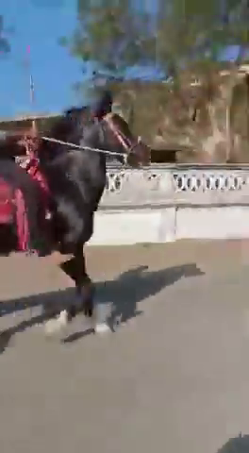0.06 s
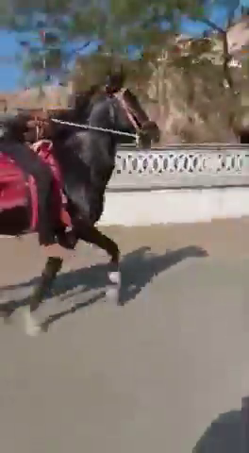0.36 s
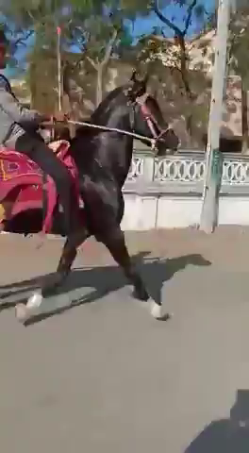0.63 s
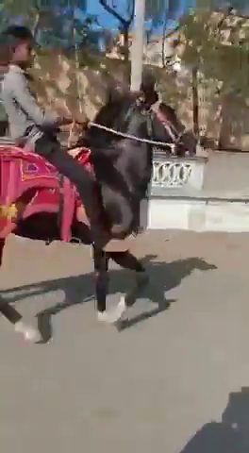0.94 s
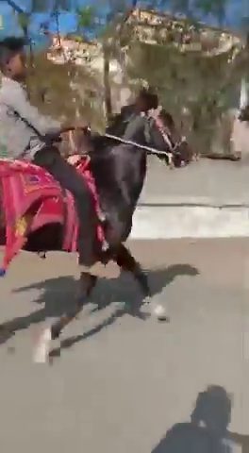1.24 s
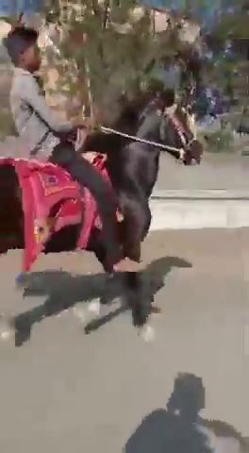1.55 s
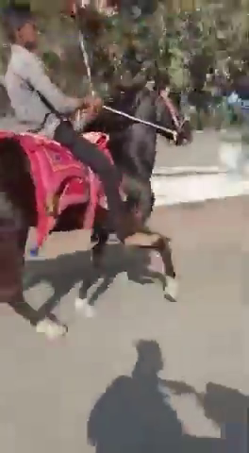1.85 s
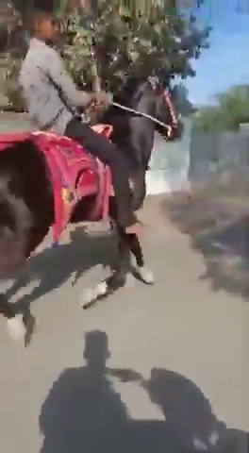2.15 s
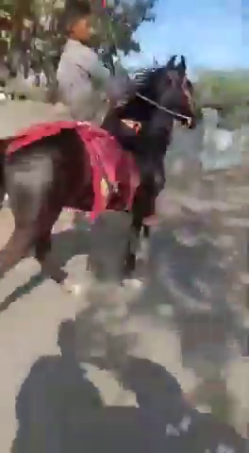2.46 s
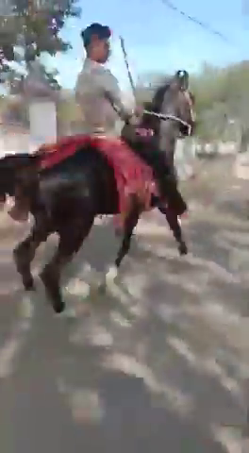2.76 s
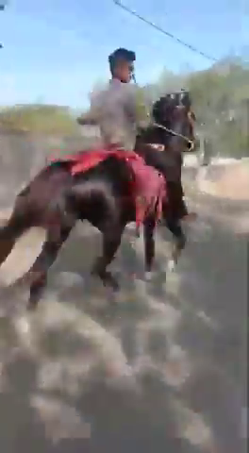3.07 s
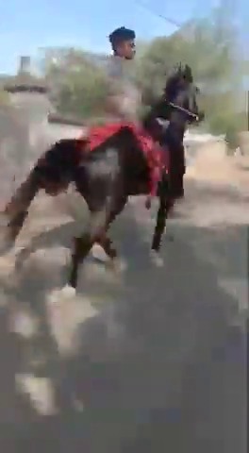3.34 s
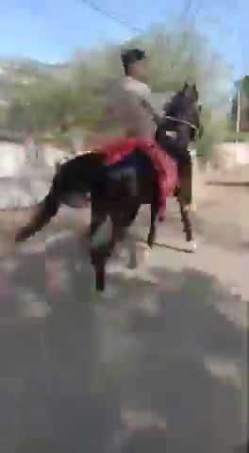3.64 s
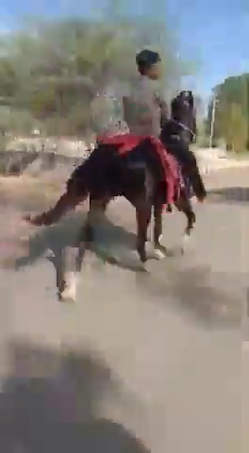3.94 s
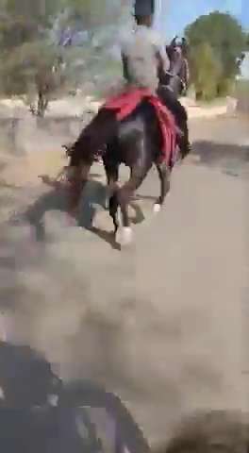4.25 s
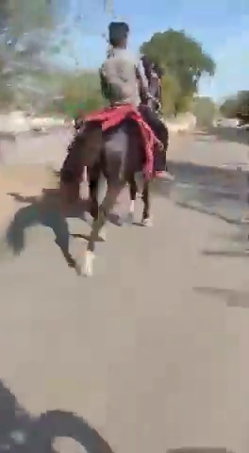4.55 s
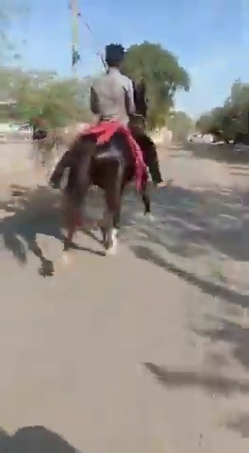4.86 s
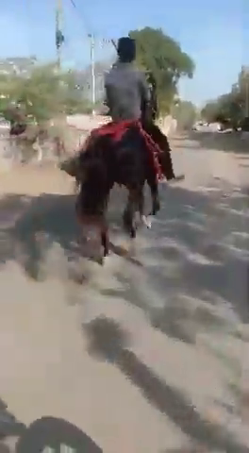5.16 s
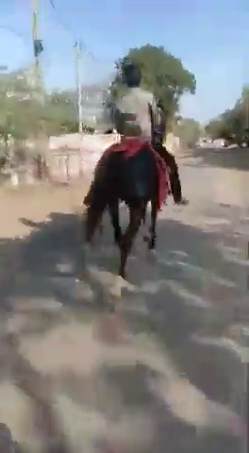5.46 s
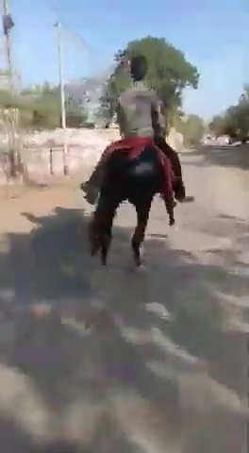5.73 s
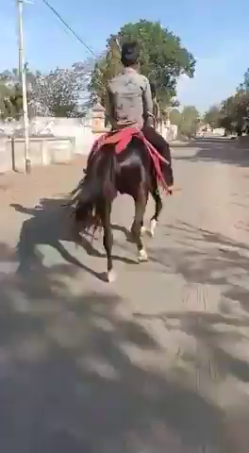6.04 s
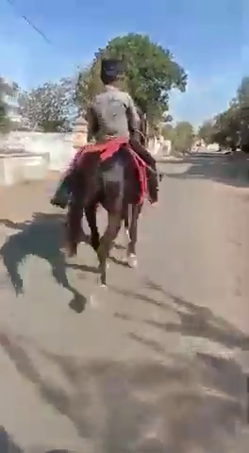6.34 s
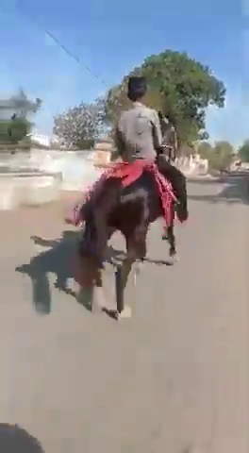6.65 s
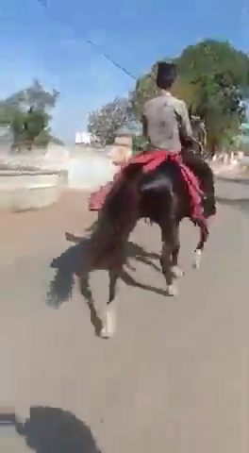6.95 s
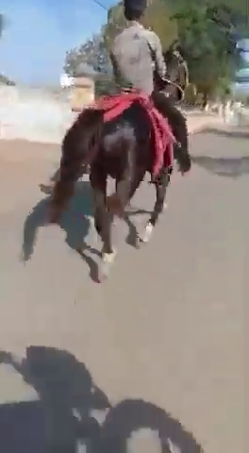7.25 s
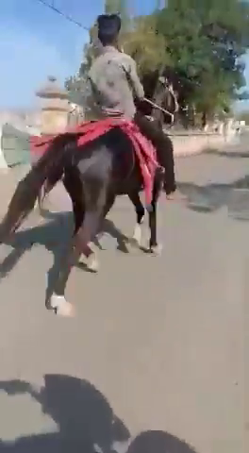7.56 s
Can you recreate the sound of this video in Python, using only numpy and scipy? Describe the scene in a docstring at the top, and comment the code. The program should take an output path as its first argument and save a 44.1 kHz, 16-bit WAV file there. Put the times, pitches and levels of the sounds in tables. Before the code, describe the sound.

Wind rumbles and gusts on the microphone over fast, sharp hoofbeats on pavement and a nearby motorcycle's low thump and hiss.

```python
"""A horse at a fast four-beat gait on a gritty paved road, heard from a motorcycle following behind.
About nine times a second a hoof lands: its wall knocks, the hollow under the sole clops, grit crunches,
and the roadside returns a short echo. Wind buffets, slaps and roars right on the mono microphone. Under
it, close by, the engine thumps and hisses; two thin squeaks pass, and for a moment a loose part rattles,
starting in time with the engine and quickening."""
import sys
import numpy as np
from scipy import signal
from scipy.fft import rfft, irfft
from scipy.io import wavfile
from scipy.ndimage import uniform_filter1d

SR = 44100
rng = np.random.default_rng(int(sys.argv[2]) if len(sys.argv) > 2 else 0)


def inscribe(sig):
    """Save sig as 16-bit PCM at rate SR to the path in sys.argv[1].

    A 1-D sig is mono; a 2-D sig holds one channel per row.
    Samples are clipped to [-1, 1] before scaling.
    """
    pcm = np.round(np.clip(np.atleast_2d(sig).T, -1, 1) * 32767)
    wavfile.write(sys.argv[1], SR, pcm.astype(np.int16))


N = 335160
TIME = np.arange(N) / SR
GUST_S = 0.021  # half length of a gust, lull or big eddy

# hoof falls: t/s, knock level/dB, knock f/Hz, clop level/dB, clop f/Hz, grit level/dB, crunch length/s
HOOF_FALLS = [(0.0024, -49.5, 2290, -37.5, 1440, -35, 0.011), (0.13, -46, 2230, -30, 1120, -43, 0.022),
              (0.2263, -57, 2440, -39, 960, -35.5, 0.013), (0.3285, -33, 2520, -54, 1340, -34, 0.014),
              (0.4364, -33, 2100, -31, 1440, -36.5, 0.02), (0.4935, -48, 2660, -51, 1540, -33.5, 0.006),
              (0.5586, -58, 2560, -44, 1410, -43, 0.018), (0.653, -59, 2290, -39, 1510, -38.5, 0.011),
              (0.7541, -39, 2680, -37, 1070, -35.5, 0.008), (0.8773, -49, 2500, -31.5, 1470, -37, 0.022),
              (0.977, -54, 2810, -42, 1020, -42, 0.018), (1.082, -52, 2470, -49, 1350, -39, 0.023),
              (1.1876, -40, 2130, -29, 1500, -37, 0.0079), (1.2987, -31.5, 2230, -36, 1540, -42, 0.023),
              (1.404, -43, 2490, -34, 1120, -40.5, 0.014), (1.525, -48, 2060, -36.5, 1480, -43, 0.016),
              (1.614, -49, 2220, -36, 1090, -43.5, 0.0078), (1.729, -45, 2030, -33, 1310, -39.5, 0.026),
              (1.837, -37.5, 2220, -29, 1170, -51, 0.012), (1.942, -42, 2280, -31.5, 980, -40.5, 0.018),
              (2.041, -30, 2140, -30, 1160, -40, 0.014), (2.1577, -31, 2110, -35, 1140, -38.5, 0.024),
              (2.255, -39, 2390, -39, 1210, -40.5, 0.014), (2.3688, -42, 2250, -50, 1250, -35, 0.0086),
              (2.465, -35, 2480, -38, 1190, -42.5, 0.0091), (2.574, -45, 2430, -35, 1140, -37.0, 0.021),
              (2.687, -35, 2160, -29, 1080, -37, 0.0093), (2.796, -49, 2680, -33, 1200, -35, 0.021),
              (2.894, -39.5, 2480, -34, 1200, -37, 0.0064), (3.0012, -35, 2670, -32, 1250, -33, 0.013),
              (3.108, -39, 2670, -41, 1530, -38.5, 0.01), (3.231, -37, 2500, -38, 1340, -39.5, 0.022),
              (3.3115, -33.5, 2320, -31, 980, -39.5, 0.015), (3.424, -24.5, 2380, -31, 1300, -40, 0.026),
              (3.534, -38.5, 2430, -45.5, 1470, -40, 0.0045), (3.6388, -34, 2820, -29, 1200, -35.5, 0.013),
              (3.746, -35, 3540, -44, 1120, -32.5, 0.0087), (3.8594, -43, 2780, -43, 1180, -36.5, 0.023),
              (3.9688, -34, 1910, -35, 1490, -41.0, 0.091), (4.0657, -37, 2920, -30, 955, -37, 0.004),
              (4.163, -36, 2420, -33, 1000, -38.5, 0.014), (4.2899, -24, 2350, -32, 1060, -41, 0.02),
              (4.33, -37, 2700, -38, 1540, -36, 0.0099), (4.3924, -31, 2280, -34, 1540, -45, 0.051),
              (4.4852, -36, 2240, -32.5, 1250, -41, 0.044), (4.5344, -40, 2060, -46, 1390, -33, 0.0046),
              (4.6011, -32.5, 2310, -36, 1450, -44, 0.015), (4.732, -45, 2400, -54, 1540, -35, 0.016),
              (4.8265, -47, 2410, -43, 1040, -52, 0.023), (4.93, -32.5, 2760, -33.5, 1230, -38.5, 0.032),
              (5.036, -30.5, 2620, -37, 1240, -51, 0.023), (5.1701, -31, 2570, -44, 1540, -38, 0.011),
              (5.247, -39, 2070, -35, 1440, -46, 0.019), (5.3652, -33.5, 2350, -47, 1310, -39, 0.023),
              (5.457, -49, 2280, -45, 1210, -40, 0.0087), (5.598, -36, 2300, -52, 1310, -41, 0.014),
              (5.686, -35, 2330, -41, 960, -43, 0.038), (5.7919, -36.5, 2230, -35, 1220, -34, 0.016),
              (5.886, -49, 2510, -39, 1240, -49, 0.025), (6.034, -37.5, 2800, -46, 960, -37.5, 0.014),
              (6.112, -39, 2420, -42, 990, -44.5, 0.041), (6.2192, -42, 2460, -37, 1170, -36, 0.017),
              (6.3267, -48, 2470, -38, 1260, -44, 0.012), (6.462, -30, 2240, -47, 1530, -39, 0.015),
              (6.5392, -42, 2620, -38, 1420, -47, 0.038), (6.646, -39, 2530, -31.5, 1440, -39, 0.016),
              (6.6843, -37, 2420, -46, 1270, -51, 0.014), (6.7586, -38.5, 2600, -31.5, 1270, -47, 0.037),
              (6.874, -36, 2580, -34, 1120, -43, 0.017), (6.981, -42, 1910, -42, 960, -43, 0.0062),
              (7.09, -39, 2480, -38, 1540, -30, 0.012), (7.191, -35, 2360, -49, 1540, -41, 0.0082),
              (7.3018, -41, 2170, -30.5, 1560, -40, 0.019), (7.4002, -39, 2370, -36, 980, -49, 0.014),
              (7.5164, -39, 2600, -31.5, 990, -38, 0.04)]
# very high band of the squeaks and the rattle's tick: f/Hz, level/dB
TICK_SPECTRUM = [(11000, -32), (13000, -11), (14400, 0), (15400, -4), (16500, -14)]


def gain_of(db):
    """Decibels to amplitude."""
    return 10 ** (np.asarray(db) / 20)


def unit_rms(x):
    """Scales to rms 1."""
    return x / np.sqrt(np.mean(x ** 2) + 1e-20)


def steadied(x, size):
    """Holds the rms near 1 over stretches of size samples."""
    return x / np.sqrt(uniform_filter1d(uniform_filter1d(x ** 2, size), size) + 1e-12)


def add(mix, s, sound):
    """Mixes a sound in at s seconds."""
    part = mix[max(round(s * SR), 0):][:len(sound)]
    part += sound[:len(part)]


def curve(points):
    """Joins (time, value) points with straight lines across the scene."""
    return np.interp(TIME, *np.transpose(points))


def bump(s, half_s):
    """A smooth swell of height 1 around s seconds."""
    return np.exp(-((TIME - s) / half_s) ** 2)


def wander(rate):
    """Random motion of rms 1 that rolls off above rate Hz."""
    hz = np.fft.rfftfreq(N, 1 / SR)
    return unit_rms(irfft(rfft(rng.standard_normal(N)) * np.exp(-(hz / rate) ** 2), N))


def coloured(x, spectrum, peaks=()):
    """Filters by a spectrum with optional resonances; white noise keeps its power."""
    hz = np.fft.rfftfreq(len(x), 1 / SR)
    points_hz, points_db = np.transpose(spectrum)
    shape_db = np.interp(np.log(hz + 1), np.log(points_hz), points_db)
    for centre, width, height in peaks:
        shape_db += height / (1 + (2 * (hz - centre) / width) ** 2)
    return irfft(rfft(x) * unit_rms(gain_of(shape_db)), len(x))


def blended(x, spectrum, ratio, share):
    """Filters by a spectrum that blends, by share, into the same one moved in pitch by ratio."""
    moved = [(hz * ratio, db) for hz, db in spectrum]
    return (1 - share) * coloured(x, spectrum) + share * coloured(x, moved)


def mottled(x, depth_db, size):
    """Random patches of colour; size = (bins, frames) of one patch."""
    frames = signal.stft(x, nperseg=256, noverlap=192)[2]
    patches = uniform_filter1d(rng.standard_normal(frames.shape), size[0], axis=0)
    patches = unit_rms(uniform_filter1d(patches, size[1], axis=1))
    frames = frames * unit_rms(gain_of(depth_db * patches))
    return signal.istft(frames, nperseg=256, noverlap=192)[1][:N]


def lifted(x, low_hz, high_hz, db):
    """Raises or lowers one band along a level curve."""
    bandpass = signal.butter(2, [low_hz, high_hz], "band", fs=SR, output="sos")
    return x + (gain_of(db) - 1) * signal.sosfiltfilt(bandpass, x)


def struck(modes, hz, touches):
    """Damped modes rung by a cluster of touches, with the energy of 10 ms at rms 1."""
    t = np.arange(len(touches)) / SR
    ring = np.zeros(len(t))
    force = touches * rng.standard_normal(len(t))
    for k, (ratio, db, t60) in enumerate(modes):
        decay = gain_of(db + rng.standard_normal() - 60 * t / t60)  # no two blows ring alike
        ring += (-1) ** k * decay * np.sin(2 * np.pi * hz * ratio * t)
    sound = signal.fftconvolve(force, ring)[:len(t)]
    return sound * np.sqrt(0.01 * SR / np.sum(sound ** 2))


def stone_crack(since, decay_s=0.00081, low_hz=1600, high_hz=5500, width_hz=800, ring_db=10):
    """Stones snap under the landing hoof: a sudden burst that rings at two new pitches each time."""
    # a snapping stone: f/Hz, level/dB
    spectrum = [(600, -8), (1000, 3), (5800, -5), (12000, -25)]
    rings = [(hz, width_hz, ring_db) for hz in low_hz * (high_hz / low_hz) ** rng.random(2)]
    burst = steadied(coloured(rng.standard_normal(len(since)), spectrum, rings), size=60)
    return burst * (since > 0) * np.exp(-abs(since) / decay_s)


def crushed_grit(grain_db=4.0, flicker_db=1.4):
    """Stones give way in clumps a millisecond or two long, each with its own colour."""
    # grit under a hoof: f/Hz, level/dB
    spectrum = [(700, -24), (1800, -2), (2400, 12), (2900, 1), (4000, 2.5), (5400, 3.5), (6300, 4.5),
                (7900, -1.5), (8900, -7.5), (10300, -9.5), (11300, -16.5), (12700, -18), (15500, -20)]
    # its top treble, brightest while the horse is alongside the microphone: t/s, level/dB
    treble = [(0, 2), (1.7, 7.5), (2.8, 1.5), (4.2, 0), (5.9, -3), (7.6, 3)]
    grains = rng.standard_normal(N) * gain_of(grain_db * wander(290))
    grains = mottled(grains, depth_db=2.0, size=(5, 8))
    grains = steadied(coloured(grains, spectrum), size=300)
    return lifted(grains, 7900, 0.45 * SR, curve(treble) + flicker_db * wander(100))


def hooves(toe_s=0.0028, second_clop_s=0.022, slide_s=0.035, scuff_s=0.0042):
    """The toe brushes the grit, the hoof lands, rings and crunches; a softer second clop follows."""
    # modes of the hoof wall: multiple of the knock pitch, level/dB, t60/s
    wall_modes = [(.72, 1, 0.0039), (1, 4.5, 0.014), (1.19, 2, 0.0047), (1.6, -14.5, 0.0077)]
    # modes of the hollow under the sole: multiple of the clop pitch, level/dB, t60/s
    sole_modes = [(.74, 2.5, 0.011), (1, 5.5, 0.013), (1.36, -5.5, 0.0056)]
    # light scrapes between the falls: t/s, level/dB
    scuffs = [(0.044, -29), (1.435, -33), (3.3558, -38), (3.5892, -35), (5.337, -26), (5.379, -32),
              (5.4064, -33), (5.8114, -36), (5.827, -27.5), (6.196, -26.5), (6.615, -33)]
    lead = SR // 50  # room for the toe ahead of the landing
    since = np.arange(SR // 8) / SR - lead / SR
    after = np.maximum(since, 0)
    toe = np.exp(np.minimum(since, 0) / toe_s)
    slide = gain_of(-19) * np.exp(-after / slide_s)
    blows, pressure = np.zeros((2, N + lead))
    for s, knock_db, knock_hz, clop_db, clop_hz, grit_db, crunch_s in HOOF_FALLS:
        # a hard knock lands in one touch; 7 dB softer, the touches spread twice as long, up to a limit
        spread_s = min(0.00031 * 2 ** ((-29 - knock_db) / 7), 0.0014)
        touches = np.exp(-(since / spread_s - 0.5) ** 2)
        wall = gain_of(knock_db - 3.5) * struck(wall_modes, knock_hz, touches)
        sole = gain_of(clop_db - 1.5) * struck(sole_modes, clop_hz, touches)
        add(blows, s, wall + sole)
        add(blows, s + rng.uniform(0.005, 0.012), gain_of(-13) * (wall + sole))  # a faint, quick repeat
        add(blows, s + second_clop_s * rng.uniform(0.92, 1.08), gain_of(-7) * sole)
        # the crack needs both a hard blow and stones to break
        crack_db = (max(knock_db, clop_db) + grit_db) / 2 + 9 + 2.5 * rng.standard_normal()
        add(blows, s, gain_of(crack_db) * stone_crack(since))
        crunch = toe * (np.exp(-(after / crunch_s) ** 3) + slide)
        add(pressure, s, gain_of(grit_db - 1.8) * crunch)
    for s, db in scuffs:
        add(pressure, s, gain_of(db - 7) * np.exp(-abs(since) / scuff_s))
    return blows[lead:] + crushed_grit() * pressure[lead:]


def pebbles(low_hz=3200, high_hz=9000, t60=0.025, scatter_s=0.017, tilt_db=-5, count=4):
    """Each hoof pinches a few small stones, which ping briefly; the higher, the fainter."""
    t = np.arange(SR // 20) / SR
    pings = np.zeros(N)
    for s, *_, grit_db, _ in HOOF_FALLS:
        for smallness, lateness in rng.random((count, 2)):
            hz = low_hz * (high_hz / low_hz) ** smallness
            decay = gain_of(grit_db - 6 + tilt_db * smallness - 60 * t / t60)
            delay_s = -scatter_s * np.log(1 - lateness)
            add(pings, s + delay_s, decay * np.sin(2 * np.pi * hz * t))
    return pings


def roadside(x, echo_db=-13, t60=0.24, taps_per_s=1500, first_s=0.008):
    """Walls and trees along the road scatter a short, thin echo back to the microphone."""
    t = np.arange(SR // 3) / SR
    taps = rng.standard_normal(len(t)) * (rng.random(len(t)) < taps_per_s / SR)
    taps *= (t > first_s) * gain_of(-60 * t / t60)
    return x + gain_of(echo_db) * signal.fftconvolve(x, taps / np.linalg.norm(taps))[:N]


def exhaust(firings_per_s, level_db=-34, pipe_hz=135, decay_cycles=0.082):
    """A single cylinder, its speed wavering slightly, thumps in the pipe below the microphone."""
    cycle = (np.cumsum(firings_per_s * (1 + 0.0247 * wander(2.01))) / SR) % 1
    pulse = np.exp(-cycle / decay_cycles) * (1 - cycle) * cycle
    pipe = np.sin(2 * np.pi * pipe_hz * cycle / firings_per_s)
    return gain_of(level_db) * unit_rms(pulse * pipe)


def engine_whine(waver_hz=22):
    """Thin, wavering tones of the running engine."""
    # faint whines: f/Hz, level against the hiss/dB
    tones = [(3410, -20.5), (4328, -26)]
    whine = np.zeros(N)
    for hz, db in tones:
        turns = np.cumsum(hz + waver_hz * wander(25)) / SR
        whine += gain_of(db) * unit_rms(np.sin(2 * np.pi * turns))
    return whine


def engine_hiss(flicker_db=2.0):
    """Engine and tyres hiss at close range, coloured by ringing metal; the whine follows their level."""
    # the hiss over time: t/s, level/dB
    levels = [(0.0, -51), (1.06, -51), (1.63, -52.5), (2.6, -49.5), (3.02, -46), (4.5, -46.5),
              (5.04, -42.5), (6.1, -46.5), (6.7, -47), (7.22, -43.5), (7.6, -49.5)]
    # its colour: f/Hz, level/dB
    spectrum = [(300, 3), (1000, 11), (1600, 9.5), (2300, 5.5), (2700, 0.5), (4400, 1), (4800, -2),
                (6000, 0.5), (7700, -2), (8500, -12), (9500, -13.5), (11500, -22), (14500, -22),
                (16000, -24)]
    # resonances of the engine's metal: f/Hz, width/Hz, lift/dB
    casing = [(2410, 150, 0.5), (2990, 180, 3), (3530, 180, 4.5), (3760, 100, 3.5), (4260, 340, 4),
              (6850, 190, 4)]
    # two drifting bands of the hiss: t/s, lift around 3.5 kHz/dB, lift around 7 kHz/dB
    bands = [(0, -0.5, 1.5), (.9, 2.5, 4.5), (1.5, -1.5, 0.5), (3.5, 0.5, -1.5), (5.6, 0, -3.5),
             (5.95, 2, -1), (6.5, 3.5, -2.5), (6.9, -4, -4.5), (7.6, 1.5, -3)]
    level_db = curve(levels) + 5 + flicker_db * wander(70)
    hiss = mottled(rng.standard_normal(N), depth_db=2.5, size=(4, 14))
    hiss = coloured(hiss, spectrum, casing)
    times, middle_db, high_db = np.transpose(bands)
    hiss = lifted(hiss, 2300, 5500, np.interp(TIME, times, middle_db))
    hiss = lifted(hiss, 5300, 10400, np.interp(TIME, times, high_db))
    return gain_of(level_db) * (hiss + engine_whine())


def airstream():
    """Level curves of buffeting and roar in dB: slow airflow, gusts and lulls, and a shared flutter."""
    # airflow over the microphone: t/s, buffeting level/dB, roar level/dB
    flow = [(0.0, -24.5, -18.5), (0.35, -17, -18.5), (0.8, -21, -21.5), (1.25, -18.5, -20),
            (1.5, -20.5, -22), (1.95, -16.5, -20.5), (2.15, -21.5, -26), (2.52, -18, -22),
            (2.8, -23, -32.5), (3.7, -23.5, -30.5), (4.0, -20, -24.5), (4.45, -20.5, -30.5),
            (4.7, -22, -33.5), (5.02, -23.5, -37), (5.42, -17.5, -25), (5.75, -20, -25.5), (6.68, -20, -28),
            (6.8, -22.5, -21.5), (6.95, -16.5, -26), (7.08, -23, -23), (7.32, -20.5, -28.5),
            (7.6, -19.5, -21.5)]
    # brief gusts (+) and lulls (-): t/s, buffeting change/dB, roar change/dB
    gusts = [(.11, 4, -7), (.2, 3, -7.5), (.44, -7, 4.5), (.61, -1.5, -10), (2.09, -3.5, -11), (2.46, 0, 1),
             (2.88, -4.5, -1), (3.12, 5.5, 5), (3.52, 8, 4), (4.23, -1, -10), (4.31, -4.5, -41),
             (4.38, 4, 6), (4.77, -6.5, -2), (5.625, -1.5, -1), (5.69, -6, -5), (6.02, -4, -12),
             (6.82, 3, 7.5)]
    times, slow_buffet_db, slow_roar_db = np.transpose(flow)
    flutter = wander(11)
    buffet_db = np.interp(TIME, times, slow_buffet_db) + flutter
    roar_db = np.interp(TIME, times, slow_roar_db) + 1.85 * flutter
    for s, buffet_change, roar_change in gusts:
        swell = bump(s, GUST_S)
        buffet_db += buffet_change * swell
        roar_db += roar_change * swell
    return buffet_db, roar_db


def wind(lumpy_db=2.5, eddy_db=2.5, tearing=0.57, steepening=0.016):
    """Large eddies push on the microphone port; the hardest pushes tear into a brighter roar."""
    # deep buffeting: f/Hz, level/dB
    buffet_spectrum = [(20, -39), (36, -47), (51, -21), (75, -3), (105, 1), (150, 0), (220, -2),
                       (320, -6.5), (480, -16), (900, -34), (2000, -88)]
    # the roar that gusts add: f/Hz, level/dB
    roar_spectrum = [(120, -19), (260, 1.5), (400, 1.5), (600, -3.5), (800, -9.5), (1100, -20.5),
                     (1500, -29), (2500, -40), (6000, -62)]
    # colour, from a dull middle roar (0) to deeper buffeting under a higher roar (1): t/s, share
    colour = [(.68, 0), (1.0, 1), (1.85, 0.93), (2.4, 0.6), (3.5, 0.094), (4.15, 0.48), (4.6, 0.11)]
    buffet_db, roar_db = airstream()
    split = curve(colour)
    push = rng.standard_normal(N) * gain_of(lumpy_db * wander(123))
    push = steadied(blended(push, buffet_spectrum, ratio=0.9, share=split), size=1800)
    force = unit_rms(np.sqrt(abs(uniform_filter1d(push ** 2, size=150))))
    # pressure grows with the square of air speed, which makes the waves lopsided
    push -= steepening * (push ** 2 - uniform_filter1d(push ** 2, size=260))
    roar = mottled(rng.standard_normal(N), depth_db=2, size=(2, 10))
    roar = blended(roar, roar_spectrum, ratio=1.275, share=split)
    roar *= (1 - tearing + tearing * force) * gain_of(eddy_db * wander(55))
    buffeting = with_wind_thumps(push * gain_of(buffet_db + 0.5))
    return buffeting + steadied(roar, size=1600) * gain_of(roar_db - 2.5)


def wind_slaps(sag=0.066, ragged=0.25):
    """An eddy bursts on the microphone port: a few ragged swings of pressure that sag in pitch."""
    # single eddies, the longer ones hollow: t/s, level/dB, f/Hz, half length/s
    eddies = [(0.101, -14, 479, 0.0059), (0.539, -12, 474, 0.0057), (0.661, -13, 486, 0.0046),
              (0.678, -16.5, 471, 0.0073), (0.8, -15, 700, 0.0026), (1.11, -16, 588, 0.0027),
              (3.132, -14, 206, 0.0039), (4.4746, -11.5, 600, 0.002), (5.9876, -11.5, 618, 0.0015),
              (6.066, -11, 287, 0.0078), (6.2374, -11, 473, 0.0026), (6.762, -11.5, 578, 0.0029),
              (6.986, -15, 644, 0.0034), (7.053, -17, 661, 0.0038)]
    t = np.arange(-SR // 40, SR // 40) / SR
    slaps = np.zeros(N)
    for s, db, hz, half_s in eddies:
        jitter = unit_rms(uniform_filter1d(rng.standard_normal(len(t)), size=40))
        pitch_hz = hz * (1 - sag * np.tanh(t / half_s) + ragged * jitter)
        turns = rng.random() + np.cumsum(pitch_hz) / SR
        swell = gain_of(db - 1) * np.exp(-(t / half_s) ** 2)
        add(slaps, s + t[0], swell * np.sin(2 * np.pi * turns))
    return slaps


def with_wind_thumps(buffeting, thump_hz=143, ragged_octaves=0.36, takeover=0.26):
    """For a moment one big eddy takes over from the small ones: a few deep, uneven swings of pressure."""
    # big eddies on the microphone: t/s, peak level/dB
    eddies = [(1.366, -12.5), (1.452, -13.5), (1.526, -11), (1.619, -10.5), (1.701, -12), (2.194, -13.5),
              (2.25, -16.5), (2.459, -13), (4.241, -14.5), (6.382, -16.5), (6.741, -12)]
    pitch_hz = thump_hz * 2 ** (ragged_octaves * wander(90))
    swings = np.sin(2 * np.pi * np.cumsum(pitch_hz) / SR)
    for s, db in eddies:
        swell = bump(s, GUST_S)
        buffeting = buffeting * (1 - takeover * swell) + gain_of(db) * swell * swings
    return buffeting


def squeaks():
    """Thin, very high squeaks swell and fade."""
    # each squeak: t/s, half length/s, level/dB
    swells = [(4.005, .04, -57), (5.347, 0.02, -58)]
    envelope = sum(gain_of(db) * bump(s, half_s) for s, half_s, db in swells)
    return envelope * coloured(rng.standard_normal(N), TICK_SPECTRUM)


def rattle(firings_per_s, start_s=4.618, length_s=0.71, quickening_hz_per_s=2.4,
           swell_s=0.0019, lag_s=0.00079, ring_hz=1525):
    """Loose metal chatters at the engine's rate and quickens: each time a tick, then a ringing clack."""
    t = np.arange(SR // 20) / SR
    burst = t / swell_s * np.exp(1 - t / swell_s)
    clack_envelope, ticks, rings = np.zeros((3, N))
    since = TIME[TIME < length_s]
    cycles = np.floor(firings_per_s * since + quickening_hz_per_s * since ** 2 / 2)
    for age in since[np.diff(cycles, prepend=-1) > 0]:
        s = start_s + age
        slack = 1 - np.sin(np.pi * age / length_s)  # hits are hardest and ring highest midway
        force = gain_of(-2.5 * slack + 2.5 * rng.standard_normal()) * burst
        detune = 1 + 0.023 * rng.standard_normal()
        tick = coloured(rng.standard_normal(len(t)), [(hz * detune, db) for hz, db in TICK_SPECTRUM])
        add(ticks, s, gain_of(-50 - 2 * rng.standard_normal()) * force * tick)
        add(clack_envelope, s + lag_s, gain_of(-37.5) * force)
        pitch_hz = ring_hz * (1 - 0.066 * slack) * rng.uniform(0.98, 1.02)
        add(rings, s + lag_s, gain_of(-29) * force * np.sin(2 * np.pi * pitch_hz * t))
    # the dull clack: f/Hz, level/dB
    clack_spectrum = [(900, -19), (1300, -1), (1480, -6), (1680, 3), (2100, 5), (3000, -3), (6000, -3),
                      (9000, -34)]
    clacks = clack_envelope * steadied(coloured(rng.standard_normal(N), clack_spectrum), size=200)
    return ticks + clacks + rings


def scene():
    """Hooves on the road ahead, the motorcycle just below, wind right on the microphone."""
    firings_per_s = 18.3
    horse = roadside(hooves() + pebbles())
    motorcycle = exhaust(firings_per_s) + engine_hiss()
    return (horse + motorcycle + wind() + wind_slaps() + squeaks() + rattle(firings_per_s))[None]


def record(dry):
    """The microphone rounds off the strongest gusts and cuts the highest treble."""
    ceiling, edge_hz = 0.56, 15800
    rounded = dry / (1 + (dry / ceiling) ** 6) ** (1 / 6)
    lowpass = signal.firwin(511, edge_hz, window=("kaiser", 9), fs=SR)
    return signal.oaconvolve(rounded, lowpass[None], "same")


dry = scene()
out = record(dry)
inscribe(out)
```